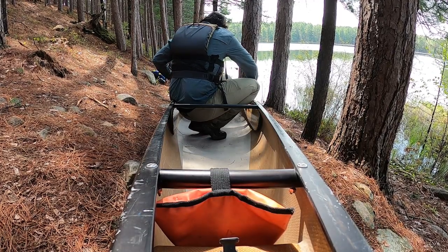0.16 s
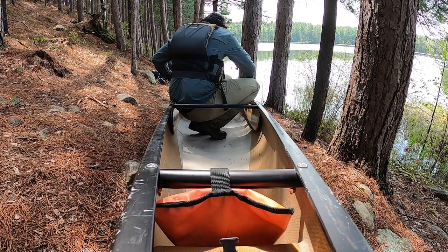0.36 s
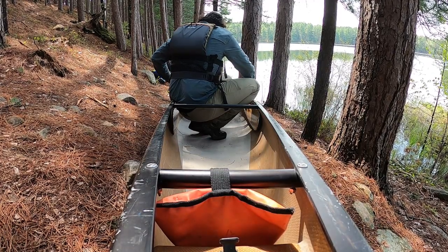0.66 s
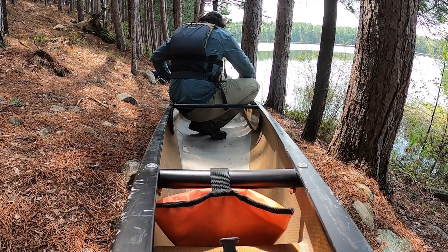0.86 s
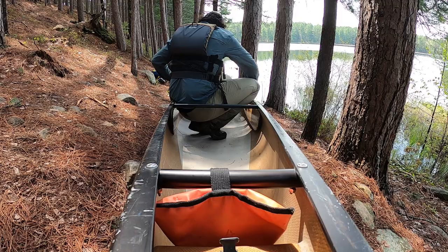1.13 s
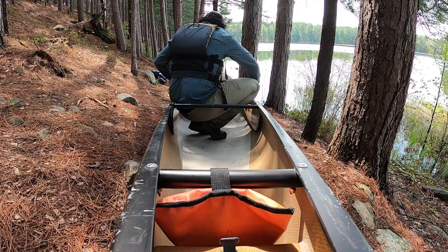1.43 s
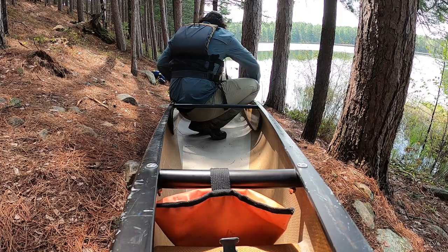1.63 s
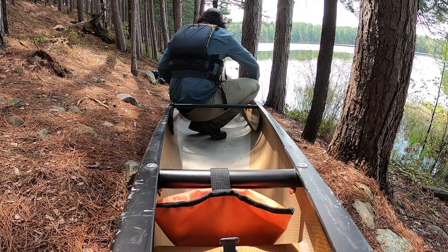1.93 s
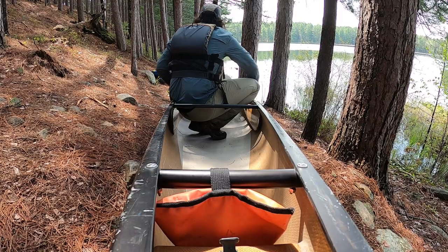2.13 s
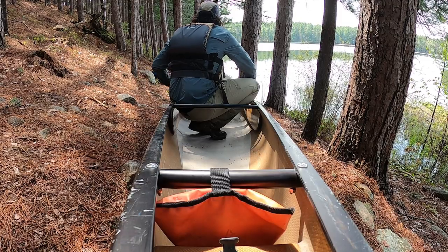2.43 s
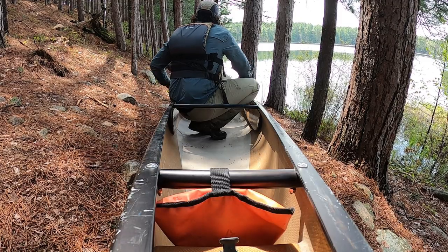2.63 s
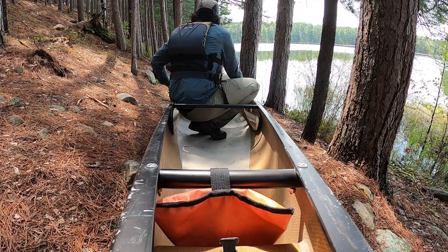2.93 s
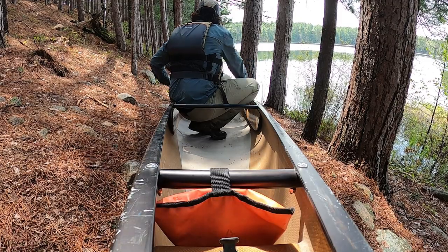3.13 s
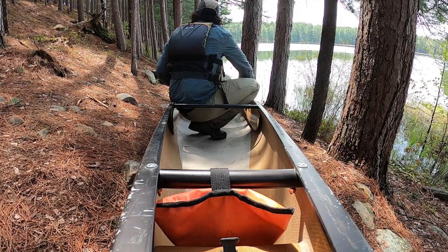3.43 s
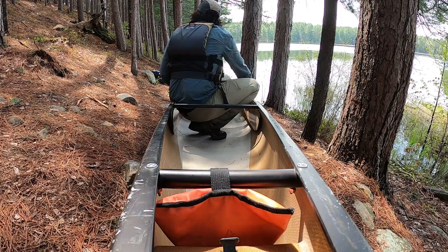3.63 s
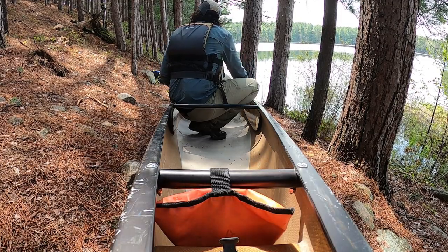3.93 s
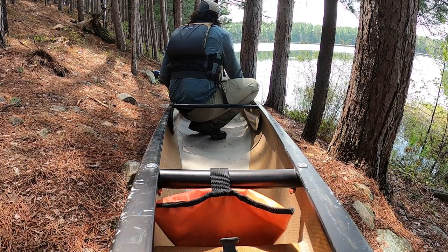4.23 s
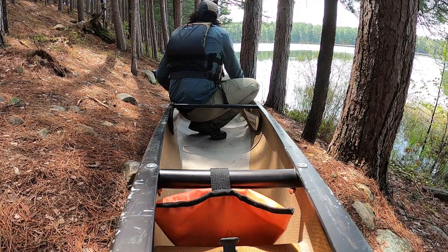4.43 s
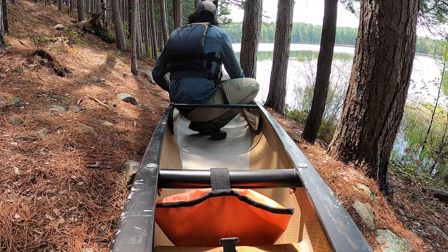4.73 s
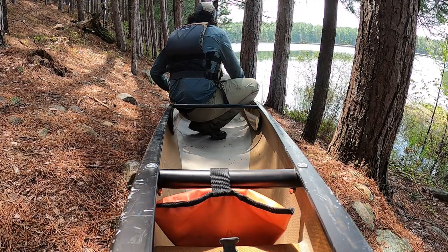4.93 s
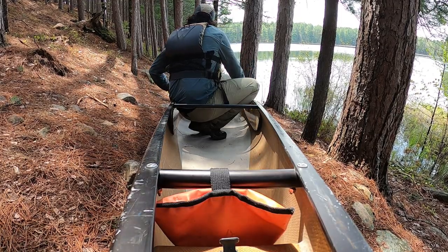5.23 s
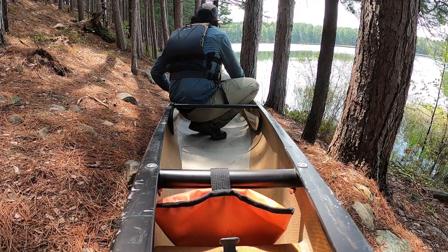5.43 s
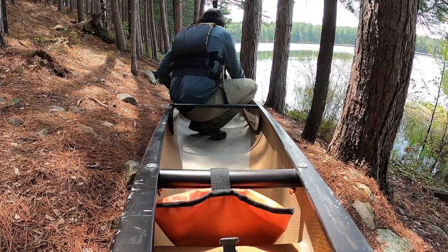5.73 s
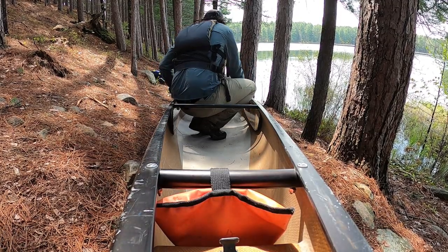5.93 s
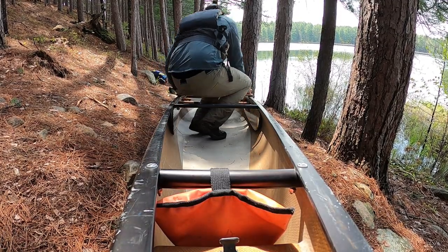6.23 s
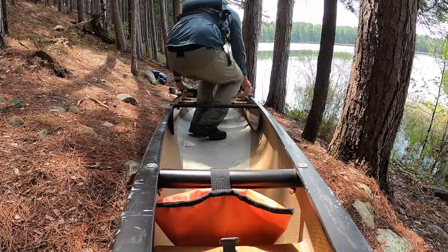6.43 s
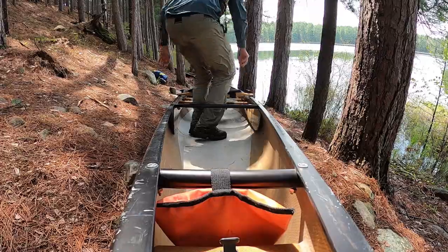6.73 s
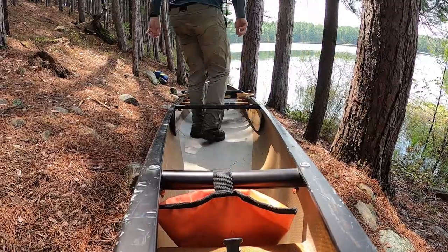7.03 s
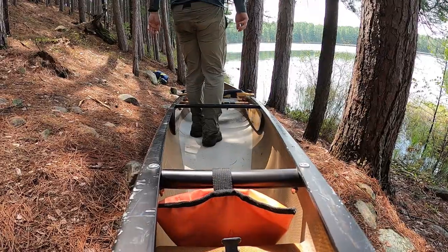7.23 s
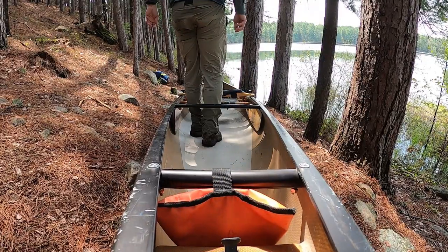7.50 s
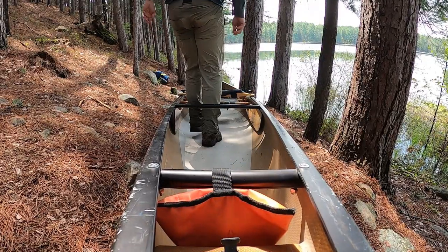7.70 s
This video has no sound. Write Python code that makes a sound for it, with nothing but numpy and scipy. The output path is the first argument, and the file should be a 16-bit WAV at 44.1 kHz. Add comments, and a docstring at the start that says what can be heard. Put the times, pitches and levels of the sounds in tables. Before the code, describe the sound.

Hollow knocks and rubbing on a canoe hull outdoors, wind buffets and a brief bird whistle, ending in a burst of scuffing thumps.

```python
"""Someone crouched in a canoe on a forest floor by a lake shifts gear, stands up and steps: each blow
rings tuned hull modes and a dying wash of noise, heard by a stereo microphone fixed on the thin hull.
Gritty noise makes the rubbing and scuffing, grainy noise the cloth, short bright bursts the ticks.
Low noise makes wind on the two microphone ports and late low thumps of the hull; gliding whistles
make one bird phrase nearby, and faint uneven noise is the air of the place."""
import sys
import numpy as np
from scipy import signal
from scipy.io import wavfile

SR = 44100
rng = np.random.default_rng(int(sys.argv[2]) if len(sys.argv) > 2 else 0)


def pcm_store(signal):
    """Save signal as 16-bit PCM."""
    levels = np.round(np.clip(np.atleast_2d(signal), -1, 1) * 32767)
    wavfile.write(sys.argv[1], SR, levels.astype(np.int16).T)


N = 346626  # samples


def from_db(db):
    """Decibels to gain."""
    return 10 ** (np.asarray(db) / 20)


def rms_one(x):
    """Scaled to rms 1."""
    return x / np.sqrt(np.mean(x ** 2) + 1e-20)


def in_time(rows):
    """Table columns after the first as curves over all samples."""
    s, *columns = np.transpose(rows)
    return [np.interp(np.arange(N) / SR, s, c) for c in columns]


def at_hz(points, hz, axis=1):
    """A table column read on a log-frequency axis."""
    points = np.array(points)
    return np.interp(np.log(hz), np.log(points[:, 0]), points[:, axis])


def swell(middle_s, db, half_s, order):
    """Bell-shaped gain; a higher order flattens the top and steepens the edges."""
    distance = np.abs((np.arange(N) / SR - middle_s) / half_s)
    return from_db(db) * np.exp(-.5 * distance ** order)


def drift(rate_hz):
    """Slow chance with spread 1, computed every 40 samples and joined by straight lines."""
    r = np.exp(-80 * np.pi * rate_hz / SR)
    white = rng.standard_normal(N // 40 + 2002)
    slow = signal.lfilter([1], [1, -2 * r, r * r], white)[2000:]  # settled part only
    return np.interp(np.arange(N) / 40, np.arange(len(slow)), rms_one(slow))


def fade(x, seconds):
    """One-pole decay with this time constant; a unit click starts at 1."""
    return signal.lfilter([1], [1, -np.exp(-1 / (seconds * SR))], x + 1e-18)


def ring(x, hz, t60):
    """A two-pole resonance: a unit click sets a sine of height 1 ringing, 60 dB down after t60."""
    r, w = from_db(-60 / (t60 * SR)), 2 * np.pi * hz / SR
    return signal.lfilter([0, np.sin(w)], [1, -2 * r * np.cos(w), r * r], x + 1e-18)


def lean(hz):
    """Left and right gains of sound from the bow at this pitch."""
    return from_db(at_hz(SIDES, hz) * np.array([[.5], [-.5]]))


# how alike the two microphone channels are: pitch_hz, likeness (0 to 1)
LIKENESS = [(60, 0.097), (150, 0.57), (400, 0.91), (1500, 0.4), (4000, 0.89), (9000, 0.13)]
# how sound from the bow leans between the channels: pitch_hz, left_minus_right_db
SIDES = [(100, 2.5), (400, -2.5), (2000, 1), (5000, 2.5), (9000, -3)]


def bands(low_hz, high_hz):
    """Half-octave bands of stereo noise, rms 1 before they lean as sound from the bow does."""
    edges = low_hz * 2 ** np.arange(0, np.log2(high_hz / low_hz) + .5, .5)
    white = rng.standard_normal((2, 2, N))  # neighbouring bands take turns
    for k, (low, high) in enumerate(zip(edges, np.minimum(edges[1:], .45 * SR))):
        band = signal.butter(2, [low, high], "band", fs=SR, output="sos")
        mid, side = signal.sosfilt(band, white[k % 2])
        hz = np.sqrt(low * high)
        alike = np.clip(at_hz(LIKENESS, hz), 0, 1)
        pair = np.sqrt(1 + alike) * mid + np.sqrt(1 - alike) * side * [[1], [-1]]
        yield hz, rms_one(pair) * lean(hz)


def coloured(bank, spectrum, patchy_db, rate_hz):
    """Noise of a spectrum whose bands flicker partly together; rms 1."""
    together, total = drift(rate_hz), 0
    for hz, pair in bank:
        if spectrum[0][0] < hz < spectrum[-1][0]:
            flicker_db = patchy_db * (together + 1.32 * drift(rate_hz / 2))
            total = total + pair * np.sqrt(hz) * from_db(at_hz(spectrum, hz) + flicker_db)
    return rms_one(total)


# relative spectrum of the air around the canoe: pitch_hz, level_db (per Hz)
AIR = [(35, -33), (60, 11), (112, -7), (198, -4.5), (306, -7), (403, 4), (822, -41), (1160, -20),
       (2160, -47.5), (5650, -20), (14500, -69)]
AIR_DB = -68


def forest_air(bank):
    """Faint broadband noise of the place, its bands slowly uneven."""
    return from_db(AIR_DB) * coloured(bank, AIR, patchy_db=2.0, rate_hz=5.5)


# steady course of the wind on the ports: time_s, relative level_db, left_minus_right_db
WIND = [(0.0, -54.5, 55), (0.08, -35.5, -7.5), (0.24, -42.5, 14.5), (0.61, -45, -15), (0.69, -45.5, 6),
        (0.95, -40, -1.5), (1.18, -38.5, 12), (1.59, -43, -2.5), (1.75, -45, 10.5), (2.22, -39.5, 2.5),
        (2.32, -39, -20), (2.48, -45, 14), (2.68, -41.5, -19.5), (2.84, -47, 4), (2.93, -33.5, -7),
        (3.05, -57, 1), (3.9, -55, 7.5), (4.2, -70, 3), (4.51, -59, 6), (5.5, -58.5, 1), (5.98, -61.5, 8),
        (7.01, -56.5, 2), (7.3, -61, 10)]
# single low swells, buffets of wind and from 7.35 s low thumps of the hull:
# middle_s, relative level_db, left_minus_right_db
LOW_SWELLS = [(.1, -48, -1), (0.46, -28.5, 0), (.7, -32.5, 6.5), (.92, -34.5, 5), (1.348, -42.5, -7),
              (1.602, -40.5, -2), (2.22, -41, -2), (2.3, -34, -12), (2.76, -33, -7.5), (2.861, -32.5, -3),
              (3.278, -41.5, 3), (3.411, -45, -1), (4.495, -34, 4), (4.84, -47.5, 3), (5.08, -47, 4),
              (5.6, -41.5, 7), (5.757, -44.5, 10), (6.11, -43, -4), (7.202, -40.5, 3), (7.385, -29.5, -7),
              (7.46, -28.5, 5.5), (7.57, -35, -2)]
LOW_SWELL_HALF_S = 0.026
# relative spectrum of the wind and the low thumps: pitch_hz, level_db (per Hz)
LOW_SPECTRUM = [(8.8, -32), (15, 4.5), (32, 0), (51, 0.5), (94, -9.5), (211, -40), (300, -46), (390, -67),
                (660, -120)]


def wind_and_low_thumps():
    """Lumpy low noise, its own at each port; strong swells reach higher in pitch."""
    level_db, pan_db = in_time(WIND)
    bells = [swell(s, db, LOW_SWELL_HALF_S, order=2) for s, db, pan in LOW_SWELLS]
    out = np.zeros((2, N))
    for side, sign in enumerate((.5, -.5)):
        swells = sum(from_db(sign * row[-1]) * bell for row, bell in zip(LOW_SWELLS, bells))
        steady = from_db(level_db + sign * pan_db + 4.94 * drift(11.5))
        port_db = 20 * np.log10(steady + swells)
        white = rng.standard_normal((2, N))
        for k, low in enumerate(15 * 2 ** np.arange(0, 4.5, .5)):
            band = signal.butter(2, [low, low * np.sqrt(2)], "band", fs=SR, output="sos")
            noise = rms_one(signal.sosfilt(band, white[k % 2]))
            brighter_db = 0.17 * np.log2(low / 30) * (port_db + 30.5)
            gain = from_db(at_hz(LOW_SPECTRUM, low * 1.277) + port_db + brighter_db)
            out[side] += noise * np.sqrt(low / 150) * gain
    return out


# the bird's two syllables before stretching: time_s after onset, pitch_hz, relative level_db
RISING = [(0, 4400, -16), (.012, 4400, -8), (.025, 4560, 1), (.04, 4800, -10.5), (.058, 4860, 1),
          (.085, 4930, -2), (.1, 4900, -25)]
FALLING = [(0, 7080, -19), (.01, 6480, -5), (.03, 5760, -3.5), (.045, 5500, -0.5), (.056, 5220, -2),
           (.062, 5400, -23)]
# when each syllable is sung: start_s, relative level_db, stretch (times as long)
RISING_AT = [(.39, -83, 1.1), (.595, -80, 1.2), (.793, -79, 0.9), (.995, -78, 1.05), (1.193, -78.5, 1.05),
             (1.408, -81.5, 1.1)]
FALLING_AT = [(.52, -84, 1), (.718, -77, 0.96), (0.921, -75, 0.9), (1.126, -75, 0.92), (1.335, -83, 1)]
PITCH_SCATTER = 0.0067  # share by which one note differs from the next
TRUNKS_T60_S, TRUNKS_DB = .28, -35  # echoes of the bird


def bird():
    """Slightly hoarse gliding whistles with a smear of echoes from the trunks."""
    song, waver = np.zeros(N), 1 + 0.0055 * drift(200)
    for shape, onsets in ((RISING, RISING_AT), (FALLING, FALLING_AT)):
        s, hz, db = np.transpose(shape)
        for start, level_db, stretch in onsets:
            t = np.arange(round(s[-1] * stretch * SR)) / SR / stretch
            first = round(start * SR)
            pitch_hz = np.interp(t, s, hz) * rng.normal(1, PITCH_SCATTER) * waver[first:][:len(t)]
            whistle = np.sin(2 * np.pi * np.cumsum(pitch_hz) / SR)
            song[first:][:len(t)] += whistle * from_db(np.interp(t, s, db) + level_db + 11.5)
    song *= from_db(2.8 * drift(37) + 2.9 * drift(250))  # hoarseness
    decay_db = -60 * np.arange(SR // 4) / SR / TRUNKS_T60_S + TRUNKS_DB
    trunks = rng.standard_normal((2, SR // 4)) * from_db(decay_db)
    echoes = signal.fftconvolve(song[None], trunks, axes=1)[:, :N]
    return song * from_db([[-1], [1]]) + echoes


# relative spectrum of the cloth: pitch_hz, level_db (per Hz)
CLOTH = [(1350, -6.5), (2300, -3.5), (2900, -11), (3490, -5), (5580, -8), (6970, -11), (8580, -9),
         (12200, -38), (14500, -34)]
# swishes of cloth: middle_s, level_db, half_length_s, extra_db above the split
SWISHES = [(0.23, -74, 0.06, -2.5), (1.06, -70, 0.057, 1), (2.734, -81.5, 0.16, 10), (3.54, -76, 0.18, -10),
           (3.837, -64.5, 0.084, -6), (5.668, -69, 0.088, -8), (6.006, -59, 0.15, -5),
           (6.434, -63, 0.14, -2), (6.77, -72, 0.11, 2.5), (7.148, -56.5, 0.18, -2.5),
           (7.418, -67, 0.091, 0.5), (7.598, -80, 0.059, 7.5), (7.77, -58.5, 0.075, -1)]
RUSTLE_DB, CLOTH_SPLIT_HZ = -81.5, 2080


def cloth(bank):
    """Fabric hisses in small grains; each swish is duller or brighter."""
    hiss = from_db(1.0 * drift(150)) * coloured(bank, CLOTH, patchy_db=1.02, rate_hz=13.0)
    dull, bright = [signal.sosfilt(signal.butter(2, CLOTH_SPLIT_HZ, kind, fs=SR, output="sos"), hiss)
                    for kind in ("low", "high")]
    swishes = sum(swell(s, db, half_s, order=3) * (from_db(bright_db) * bright - dull)
                  for s, db, half_s, bright_db in SWISHES)
    return from_db(RUSTLE_DB) * hiss + swishes


# tiny dry ticks of buckles and grit: start_s, relative level_db
TICKS = [(0.2597, -42), (0.464, -42.5), (3.439, -32.5), (5.5894, -52), (5.66, -44), (5.678, -41),
         (7.124, -57), (7.367, -33)]


def ticks():
    """Bursts of bright noise dying within milliseconds, separate noise in each channel."""
    clicks = np.zeros(N)
    clicks[[round(s * SR) for s, db in TICKS]] = from_db(np.array(TICKS)[:, 1] - 20.0)
    burst = fade(clicks, 0.0028) * rng.standard_normal((2, N))
    return signal.sosfilt(signal.butter(2, [2800, 14000], "band", fs=SR, output="sos"), burst)


# a small part rings once: start_s, pitch_hz, level_db, t60_s
PIP = [(4.238, 4780, -62, 0.045)]


def small_part():
    """One click sets a single damped sine ringing."""
    tap = np.zeros(N)
    s, hz, db, t60 = PIP[0]
    tap[round(s * SR)] = from_db(db)
    return ring(tap, hz, t60)


# a sole or bag slips: start_s, relative level_db, rise_s, fade_s, brightness_db per octave, extra rasp_db
SLIDES = [(1.221, -64, 0.0026, 0.034, -1.5, -2), (3.5, -60, 0.024, 0.14, -10.5, -4),
          (3.73, -54, 0.0027, 0.038, -13.5, 12), (3.87, -52.5, 0.006, 0.055, -6.5, -2),
          (4.5, -63, 0.03, 0.25, -17, -10), (6.77, -63, 0.018, 0.068, 0, -4),
          (7.018, -45, 0.0056, 0.069, -0.5, -12), (7.105, -56, 0.013, 0.047, -2, -6),
          (7.179, -46, 0.0022, 0.018, -7, -7.5), (7.198, -52, 0.0066, 0.025, 2.5, -9),
          (7.235, -60.5, 0.012, 0.027, -1, -4), (7.37, -41.5, 0.0088, 0.055, -7, -5),
          (7.71, -45, 0.042, 0.05, 3.5, 4.5), (7.83, -61, 0.014, 0.025, 5, -1)]
# bands favoured by a scraped patch of skin: pitch_hz, relative level_db, t60_s of the first resonance
SCRAPED = [(585, -5, 0.0088), (1066, 2.5, 0.011), (1370, -1, 0.0091), (1836, 3.5, 0.0072),
           (2610, -2.5, 0.012), (3490, -6.5, 0.0089), (4500, -15, .006), (5400, -16, .005)]
CATCHES_PER_S, CATCH_SPREAD_DB = 1500, 2.5  # catches before clumping
RASP_HZ = 2550


def slips():
    """Grit catches and lets go in clumps, over a thousand times a second; every catch rings the skin."""
    s, db, rise_s, fade_s, bright_db, rasp_db = np.transpose(SLIDES)[:, :, None]
    t = np.maximum(np.arange(N) / SR - s, 0)
    pressure = from_db(db) * (1 - np.exp(-t / rise_s)) ** 2 * np.exp(-t / fade_s)
    out, clumps = 0, drift(37.0)
    for hz, level_db, t60 in SCRAPED:
        chance = CATCHES_PER_S * from_db(3.0 * clumps + 3.0 * drift(60)) / SR
        caught = rng.random(N) < chance
        sizes_db = CATCH_SPREAD_DB * np.minimum(rng.exponential(1, N), 4)
        sizes = from_db(sizes_db) * rng.choice([-1, 1], N)
        rasping = abs(np.log2(hz / RASP_HZ)) < .25
        colour_db = level_db + bright_db[:, 0] * np.log2(hz / 1050) + rasp_db[:, 0] * rasping
        skin = rms_one(ring(ring(caught * sizes, hz, t60), hz, t60 / 2))
        out = out + lean(hz) * skin * (from_db(colour_db) @ pressure)
    return out / 2


# clear modes of the hull: pitch_hz, relative level_db, nominal t60_s,
# extra_thwart_db when the thwart is struck, extra_gunwale_db when the gunwale is struck
HULL = [(174, 3, 0.19, -10, 0.5), (208.5, 5.5, 0.15, 4.5, -1.5), (242.6, 5, 0.22, 3, 1.5),
        (338.2, -0.5, 0.094, 1.5, 4), (372.2, 3.5, 0.18, -6, 1), (432, 1, 0.048, 5.5, 1),
        (502.3, 7.5, 0.084, 0, -6), (566.3, 4, 0.063, -6, -5), (599.3, 1.5, 0.094, -0.5, 1.5),
        (801, -20, 0.061, 11, 20), (905, -3, 0.07, 4, 4), (962, -4, 0.2, 3.5, -7),
        (1027.4, 5, 0.035, -4.5, -8), (1117, 10.5, 0.021, 1.5, 0), (1171, 7, 0.042, -1, -9),
        (1299, 3, 0.016, 4, -15), (1456, -5.5, 0.08, -3, 9.5), (1566, -5.5, 0.086, 4, 10),
        (1714, -7, 0.1, 2, -5), (1842, 0, 0.027, -4, -10), (2050, 2.5, 0.014, -30, 7.5),
        (2357, 3, 0.022, -6.5, -6), (2704, 1.5, 0.011, 7, 9), (3020, -3, 0.033, 5.5, -5),
        (3226, -1.5, 0.033, -4, -8), (3260, -8, 0.08, -9, 1.5), (3540, -8.5, .05, 0, 13),
        (4514, -7, 0.05, -8, 14.5), (5400, -4, 0.06, 2, 2), (5750, -6.5, .04, 8, 2),
        (6500, -11, .04, 7, 11)]


def rubbing(bank, spectrum, sung_db, grit_db, grit_rate_hz):
    """Uneven grit drives the hull modes; noise fills between them; rms 1."""
    grit = rng.standard_normal(N) * from_db(grit_db * drift(grit_rate_hz))
    sung = sum(from_db(at_hz(spectrum, hz)) * rms_one(ring(grit, hz, 1.76 * t60)) * np.sqrt(hz)
               for hz, level, t60, *parts in HULL if spectrum[0][0] < hz < spectrum[-1][0])
    noise = coloured(bank, spectrum, patchy_db=0.79 * grit_db, rate_hz=grit_rate_hz)
    return rms_one(from_db(sung_db) * rms_one(sung) + noise)


# gear and soles scuffing: time_s, level_db
SCUFFING = [(0.0, -66.5), (0.22, -66), (0.65, -74.5), (1.14, -67), (1.42, -74), (1.97, -71), (2.21, -68),
            (2.71, -73.5), (3.81, -65), (3.94, -73.5), (4.2, -67), (4.44, -67.5), (4.52, -62),
            (4.72, -70.5), (4.8, -72.5), (4.9, -70), (5.03, -73), (5.28, -74.5), (6.02, -62), (6.15, -70.5),
            (6.3, -71.5), (6.5, -59), (6.65, -72.5), (7.0, -65.5), (7.22, -72), (7.4, -51.5), (7.57, -67.5),
            (7.86, -85)]
# relative spectrum of the scuffing: pitch_hz, level_db (per Hz)
SCUFF = [(380, -19), (650, 5), (729, -35), (1010, 8), (1210, 2), (1370, -26), (1860, -5.5), (2540, -15.5),
         (3000, -24), (3900, -43), (6600, -120)]


def gear_scuffing(bank):
    """Gear and soles drag grit over the skin, in the middle pitches."""
    (level_db,) = in_time(SCUFFING)
    return from_db(level_db) * rubbing(bank, SCUFF, sung_db=0.0, grit_db=3.5, grit_rate_hz=18.0)


# weight rubbing on the hull: time_s, level_db
RUBBING = [(0.0, -59.5), (0.35, -55), (0.5, -69), (0.94, -70), (1.53, -77), (2.08, -63.5), (2.43, -53),
           (2.65, -81), (3.15, -70), (3.52, -79), (3.7, -52.5), (4.97, -66.5), (5.36, -54.5), (5.89, -66),
           (6.02, -43), (6.24, -67.5), (6.46, -53), (6.7, -47.5), (6.87, -83), (7.11, -60.5), (7.31, -56),
           (7.53, -37.5), (7.75, -58), (7.86, -86)]
# relative spectrum of the rubbing: pitch_hz, level_db (per Hz)
RUB = [(35, -36.5), (60, -0.5), (97, -14.5), (243, 2.5), (295, -17), (371, -8.5), (413, -10.5),
       (502, -15.5), (800, -65), (1040, -60), (1760, -120)]


def weight_rubbing(bank):
    """Body weight rubs on the hull and stirs its low pitches."""
    (level_db,) = in_time(RUBBING)
    return from_db(level_db) * rubbing(bank, RUB, sung_db=-4.5, grit_db=4.0, grit_rate_hz=20.7)


def among(s, chosen):
    """Which blows are the chosen ones."""
    return np.abs(s[:, None] - chosen).min(axis=1) < .0024


# blows on the hull: start_s, relative level_db, extra_boom_db, extra_knock_db,
# hardness_db per octave (slope above the knock pitch)
BLOWS = [(0.065, -75, 21, -5, -26), (0.11, -72, 16.5, 11.5, -7.5), (0.209, -72, 0, 9, -11),
         (0.305, -43, -10, 1, -13), (0.439, -60.5, 5.5, -9, -11), (0.66, -68.5, 13, 0.5, -19),
         (0.839, -50.5, -4, -5, -15.5), (0.949, -47, -3, -6, -12), (1.198, -71, -13, 4, -12),
         (1.381, -70, -20, -4, -22), (1.672, -54, -2, -0.5, -7), (1.965, -64, 9, -17, -11),
         (2.171, -61, 5, -19, -22), (2.194, -52.5, -0.5, -3, -11.5), (2.312, -46, -5, 4.5, -11),
         (2.358, -63.5, 1, 4.5, -14.5), (2.389, -75, 19, -7, -2), (2.535, -37.5, -10.5, -1, -5),
         (2.97, -50, -1.5, -7.5, -37), (3.058, -48.5, -7, -8.5, -30), (3.089, -37.5, -15, -8.5, -40),
         (3.116, -64, -9, -10, -18), (3.186, -80, 11, 13.5, -13), (3.214, -71, -2, 4, -16),
         (3.248, -73.5, -2, 10, -15), (3.303, -68.5, 0.5, 3, -8.5), (3.483, -63.5, 8.5, -2, -29),
         (3.506, -64.5, 6, -1, -12), (4.0943, -36.5, -10.5, -1, -4.5), (4.24, -63.5, 6, -3, -6),
         (5.239, -66, 17.5, -6, -21), (5.278, -47.5, -2, -3, -14.5), (5.295, -52, -6, -8, -18),
         (5.364, -85, 2, -3, -22), (5.485, -64.5, 8, -4.5, -5), (5.847, -37, -12, 0.5, -8.5),
         (5.852, -30.5, -1, -7.5, -0.5), (5.911, -44, 1, 3, -12.5), (5.953, -61.5, 6, -3, 1),
         (6.035, -48, 0.5, 5, -4.5), (6.097, -51.5, 8, -5, -2.5), (6.228, -57.5, -21, -23, -4),
         (6.312, -59.5, -19, 8.5, -21), (6.482, -57, 4, 3, -17), (6.503, -49.5, 1, 3, -13),
         (6.529, -50.5, 6, -5, -13), (6.553, -63, 6, -3, -7), (6.59, -58.5, 15, -23, -12),
         (6.616, -61.5, 4, -2, -13), (6.706, -56, 10.5, -7, -26), (6.726, -59, 2, -7, -13),
         (6.754, -65, 18, -8, -11), (6.847, -71, 17, -18, -10), (7.037, -60, -22, 12, -26),
         (7.22, -68.5, 15, -8, -11), (7.336, -34.5, 3.5, -14, -3.5), (7.353, -44, 9.5, -5.5, -3),
         (7.389, -37, 9, -12, -7), (7.402, -37, 9, -11, -4), (7.412, -40, 5.5, -26, -9),
         (7.438, -40, 2, -6.5, -7), (7.475, -50, 2, -9, -13), (7.514, -46, 7, -15, -4),
         (7.574, -50, 8, -5, -10), (7.595, -61, 14, 1, -14), (7.679, -65.5, 18, -4, 1)]
# centres of boom, body and knock: pitch_hz
BOOM_BODY_KNOCK_HZ = [200, 550, 1200]
# treble colour shared by all blows: pitch_hz, level_db
STRIKE = [(1200, 1), (2700, 6), (5600, -1), (12000, -17.5)]
# blows not on the far skin, on the thwart, on the gunwale, steps near the microphone: start_s
ON_THWART = [2.536, 4.0945]
ON_GUNWALE = [5.847, 5.852]
STEPS = [7.336, 7.354, 7.402, 7.412, 7.437]
BLOW_DISTANCE_M, STEP_DISTANCE_M = 1.5, 0.484  # from the microphone
ARRIVAL_SPREAD_S, FIRST_ARRIVAL_DB = .0004, -5  # arrivals are spread by this much, the first one weaker


def strikes(hz, scatter_db, part_share, in_step):
    """Click train of all blows at this pitch; bending waves arrive late and spread over several paths.
    A clear mode takes the arrivals in step with its own cycles and builds up."""
    s, level_db, boom_db, knock_db, hardness = np.transpose(BLOWS)
    weights = np.c_[BOOM_BODY_KNOCK_HZ, np.eye(3)]
    boom, knock = at_hz(weights, hz, axis=1), at_hz(weights, hz, axis=3)
    part_db = sum(at_hz(HULL, hz, axis=3 + k) * among(s, part)
                  for k, part in enumerate((ON_THWART, ON_GUNWALE)))
    octaves_up = max(np.log2(hz / BOOM_BODY_KNOCK_HZ[-1]), 0)
    felt_db = level_db + part_share * part_db + at_hz(STRIKE, hz)
    felt_db = felt_db + boom * boom_db + knock * knock_db + hardness * octaves_up
    felt = from_db(felt_db + scatter_db * rng.standard_normal(len(s))) * rng.choice([-1, 1], len(s))
    distance_m = np.where(among(s, STEPS), STEP_DISTANCE_M, BLOW_DISTANCE_M)
    delay = distance_m * at_hz(HULL_WASH, hz, axis=2)
    clicks = np.zeros(N)
    for path in range(4):
        spread = delay * path / 2 + ARRIVAL_SPREAD_S * (path - 1)
        if in_step:
            spread = np.round(spread * hz) / hz  # whole cycles
        arrival = np.round((s + 0.3033 * delay + spread) * SR).astype(int)
        np.add.at(clicks, arrival, felt * from_db(FIRST_ARRIVAL_DB * (path == 0)))
    return clicks


# the many small modes between the clear ones: pitch_hz, t60_s,
# bending_delay_s per m (nominal, scaled for each path), relative level_db
HULL_WASH = [(62, 1, 0.0037, -22.5), (120, 0.42, 0.0052, -9), (196.8, 0.37, 0.0161, -6.5),
             (536, 0.13, .008, -7.5), (1159, 0.13, 0.002796, -12.5), (3600, 0.077, .001, -12),
             (7600, 0.031, 0.0015, -3.5), (12500, 0.021, .0005, -48)]


def blows(bank):
    """Each blow rings the clear modes and swells a dying wash of noise in every band."""
    modes, wash = 0, 0
    for hz, level_db, t60, *parts in HULL:
        clicks = strikes(hz, scatter_db=3.0, part_share=0.9, in_step=True)
        held_t60 = min(t60, 0.56 * at_hz(HULL_WASH, hz))
        modes = modes + from_db(level_db - 10.5) * ring(clicks, hz, held_t60)
    for hz, pair in bank:
        t60, level_db = at_hz(HULL_WASH, hz), at_hz(HULL_WASH, hz, axis=-1)
        rise_s = 0.5 / hz + 0.00095
        clicks = strikes(hz, scatter_db=0.0, part_share=0.34, in_step=False)
        dying = fade(clicks ** 2, t60 / np.log(10 ** 6))  # power falls 60 dB in t60
        power = fade(dying, rise_s) / (rise_s * SR)
        wash = wash + from_db(level_db) * np.sqrt(power) * pair
    return modes + wash


LEFT_LAG_SAMPLES = 2


def scene():
    """All but the wind and low thumps reaches the right port a little first."""
    bank, other = list(bands(45, 15000)), list(bands(45, 15000))
    bow = forest_air(other) + bird() + cloth(bank) + ticks() + small_part()
    bow = bow + slips() + gear_scuffing(bank) + weight_rubbing(bank) + blows(other)
    bow[0] = np.roll(bow[0], LEFT_LAG_SAMPLES)
    return bow + wind_and_low_thumps()


def record(dry):
    """The top is cut: 40 dB down from 15 kHz upward."""
    return signal.sosfilt(signal.cheby2(10, 40, 15000, fs=SR, output="sos"), dry)


dry = scene()
out = record(dry)
pcm_store(out)
```